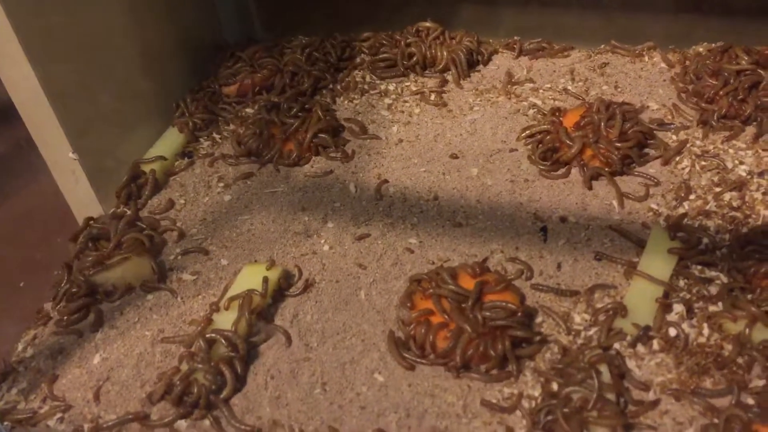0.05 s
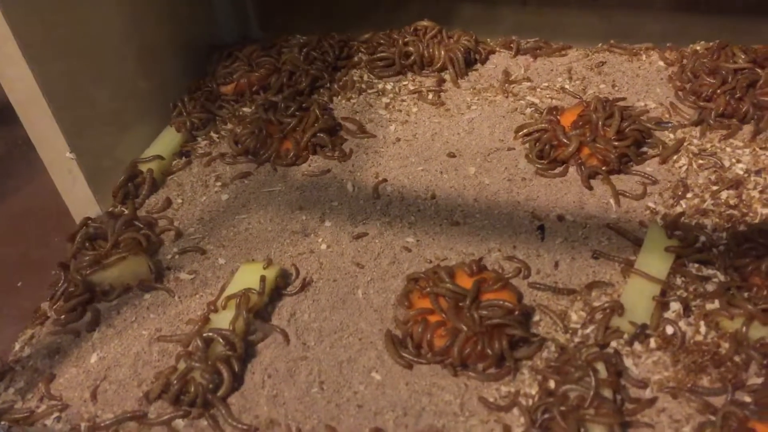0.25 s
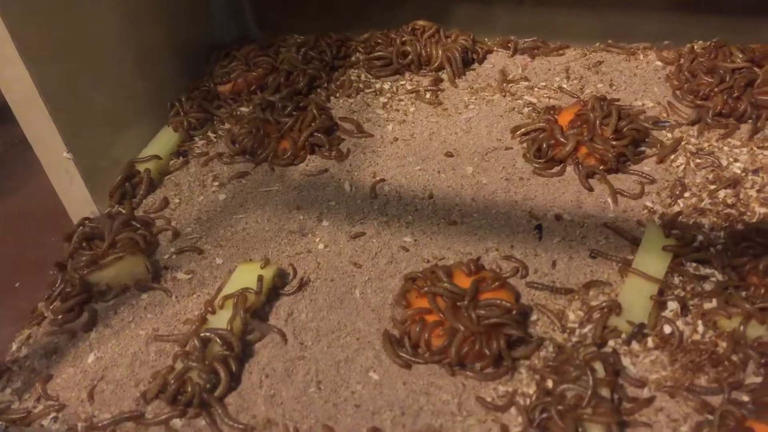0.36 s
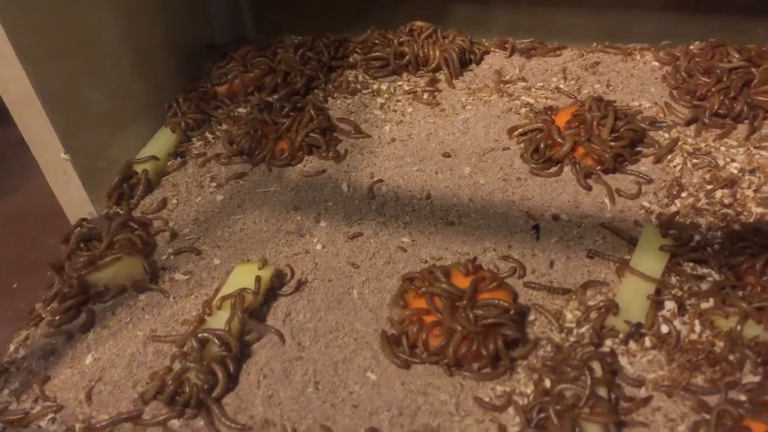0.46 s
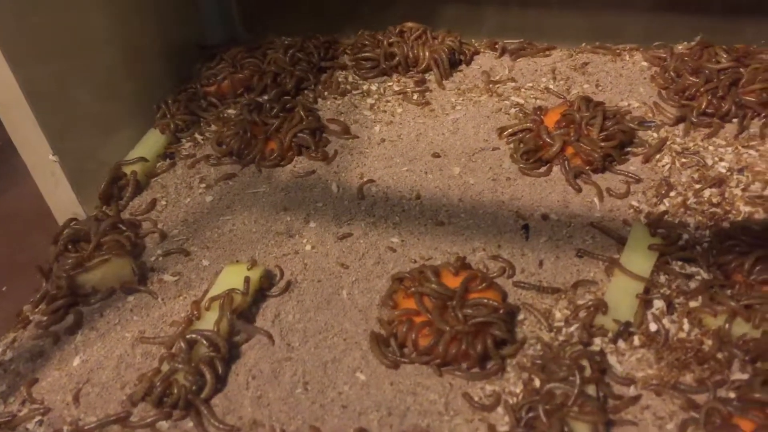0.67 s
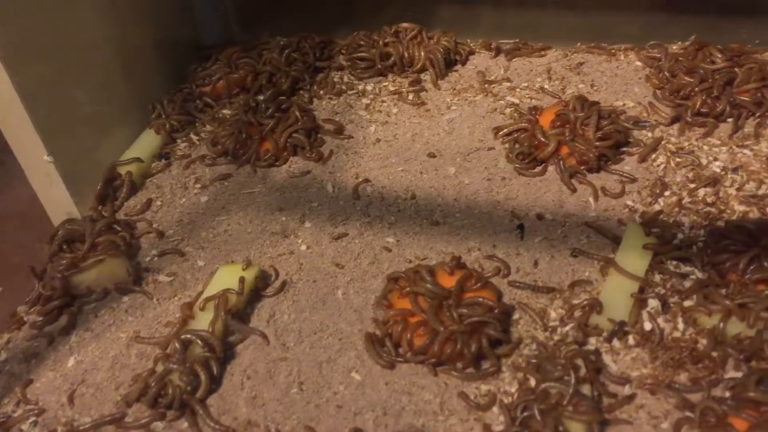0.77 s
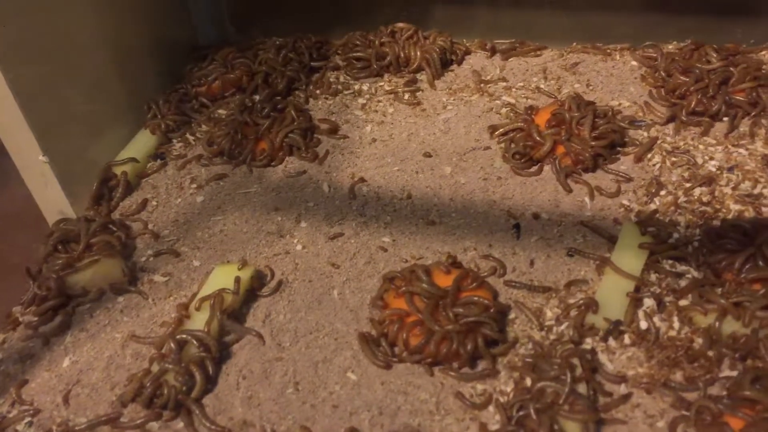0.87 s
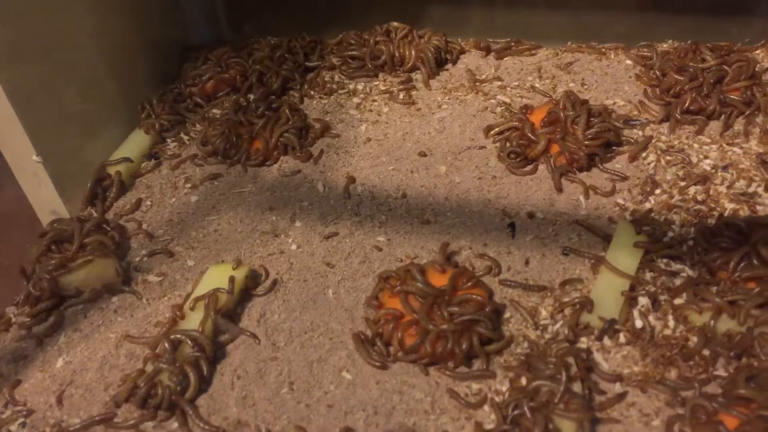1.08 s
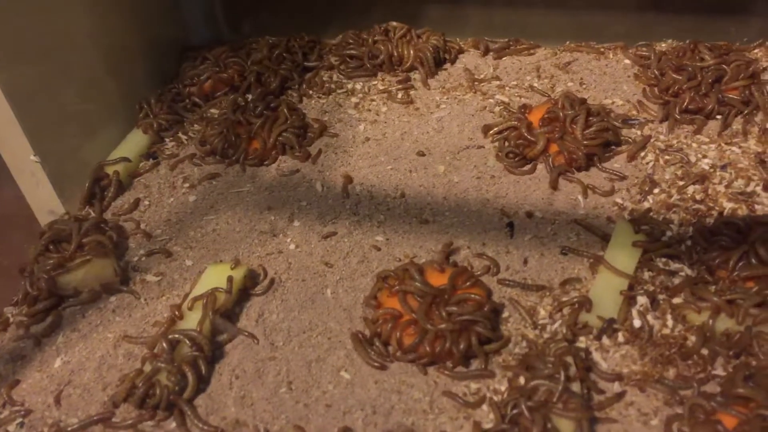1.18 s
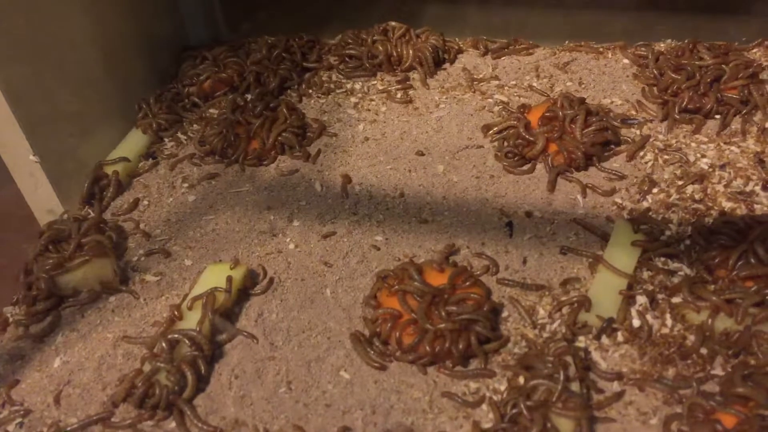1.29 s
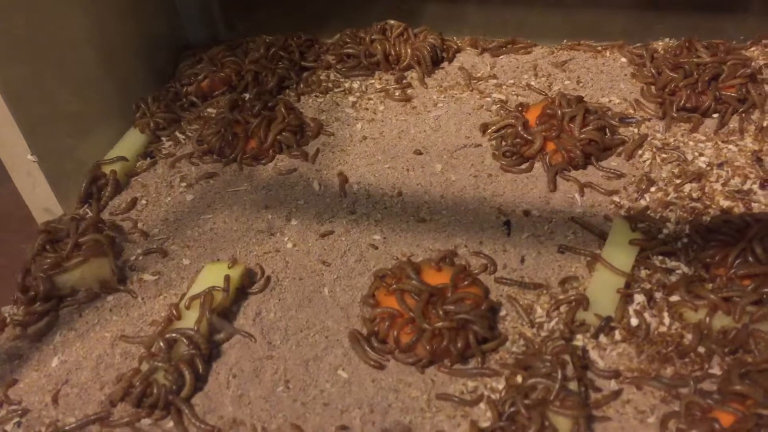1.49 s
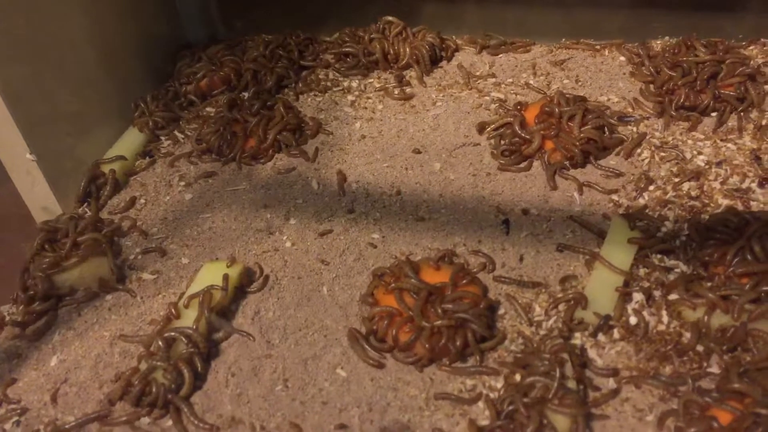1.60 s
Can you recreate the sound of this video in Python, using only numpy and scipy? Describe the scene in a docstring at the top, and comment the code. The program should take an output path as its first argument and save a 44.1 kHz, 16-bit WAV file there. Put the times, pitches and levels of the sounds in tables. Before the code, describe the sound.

A plastic tub is handled close up, giving a soft, low, shuddering thump at about 0.3 seconds, with a dull finger scuff and a brief falling groan from its wall. Smaller nudges fade away through 1.5 seconds. Very faint dry bran rustles accompany the handling, with tiny squeaks near 1.1 and 1.5 seconds. Quiet room hiss and a low electrical hum continue throughout.

```python
"""A quiet room, close over a plastic tub of mealworms: steady air hiss, mains hum and fan tones.
The tub is handled once: a push sets it swinging in a soft, shuddering thump over a low rumble,
then come smaller and smaller nudges. Fingers rub the wall, which groans on a falling note, and
friction rings its modes in a dull scuff. Faint dry bran rustles and tiny stick-slip squeaks
come with the handling."""
import sys
import numpy as np
from scipy import signal
from scipy.fft import rfft, irfft
from scipy.io import wavfile

SR = 44100
rng = np.random.default_rng(int(sys.argv[2]) if len(sys.argv) > 2 else 0)


def unload_wav(signal):
    """Save mono or channel-first audio to the path in sys.argv[1] as 16-bit WAV at rate SR, clipped to [-1, 1]."""
    wavfile.write(
        sys.argv[1],
        SR,
        np.round(np.clip(np.atleast_2d(signal).T, -1, 1) * 32767).astype(np.int16),
    )


N = 72765
T = np.arange(N) / SR
HZ = np.fft.rfftfreq(N, 1 / SR)

# air and hiss spectrum (frequency [Hz], relative density [dB])
AIR_SPECTRUM = [(20, -13.5), (45, 8), (70, 6), (130, 3.5), (180, -2.5), (300, -2.5), (480, -12),
                (950, -11.5), (1500, -15.5), (2300, -15), (3200, -17), (4400, -18.5), (5000, -21.5),
                (6300, -19.5), (7600, -23.5), (8900, -21.5), (10500, -26.5), (11800, -24.5), (13500, -24.5),
                (14800, -32), (16000, -22)]
# mains hum and fan tones (frequency [Hz], level [dB])
HUM_TONES = [(60, -69.5), (120, -68.5), (240, -77.5), (300, -76), (360, -80.5), (420, -95), (600, -90.5),
             (660, -93), (840, -90), (900, -98), (1500, -93.5), (1919, -90)]
# dry bran rustles (peak time [s], centre [Hz], width [Hz], level [dB], rise and fall [s])
BRAN_RUSTLES = [(0.106, 2120, 597, -74.5, 0.04), (0.153, 9000, 12500, -76.5, 0.017),
                (0.299, 7600, 12100, -74.5, 0.032), (0.358, 4150, 1000, -70, 0.021),
                (0.359, 9550, 12500, -74, 0.04), (.495, 10200, 11300, -71.5, 0.025),
                (1.026, 4500, 700, -76.5, 0.014), (1.09, 4000, 1210, -76.5, 0.015),
                (1.114, 1400, 1300, -72, 0.024), (1.124, 2250, 1000, -77, 0.014)]
# stick-slip squeaks (peak time [s], pitch [Hz], level [dB], rise [s], fall [s], roughness [0-1])
SLIP_SQUEAKS = [(0.247, 1029, -66, 0.017, 0.0051, 0.25), (0.275, 662, -64, 0.013, 0.028, 0.07),
                (0.32, 1254, -71.5, 0.016, 0.0065, 0), (0.35, 430, -65, 0.056, 0.017, 0),
                (1.0895, 2123, -63, 0.0046, 0.0067, 0.1), (1.101, 2126, -60.5, 0.0049, 0.0062, 0),
                (1.538, 2413, -68.5, 0.016, .015, 0.96), (1.546, 2138, -62.5, 0.012, 0.0057, 0),
                (1.565, 2210, -68, 0.016, 0.011, 0.54)]
# tub modes (frequency [Hz], width [Hz], relative level [dB])
TUB_MODES = [(281.4, 60, 8), (410, 75, -3.5), (560, 21, -11.5), (654, 100, -4.5), (864, 220, -5.5),
             (1077, 47, -11), (1286, 30, -14)]
# wall scuff envelope (time [s], level [dB])
SCUFF_ENVELOPE = [(.21, -87), (.232, -65), (.252, -54), (.275, -59), (.31, -65), (.36, -64), (.39, -69),
                  (.52, -76.5), (.62, -85)]
# handling rumble envelope (time [s], level [dB])
RUMBLE_ENVELOPE = [(0, -63.5), (.2, -60.5), (.3, -50), (.45, -50.5), (.65, -66.5), (.84, -59.5), (.97, -84),
                   (1.22, -96), (1.38, -65), (1.54, -75), (1.65, -73)]
# finger rub envelope (time [s], level [dB])
RUB_ENVELOPE = [(0, -59.5), (.1, -68.5), (.2, -63.5), (.25, -52.5), (.32, -48), (.38, -54), (.46, -61.5),
                (.55, -71), (.65, -88), (.9, -86)]
# wall groan (time [s], pitch [Hz], level [dB])
GROAN_TRACK = [(.22, 275, -62.5), (0.244, 273.6, -55.5), (.255, 258.4, -41.5), (0.273, 258.5, -52.5),
               (0.291, 224.3, -42.5), (0.309, 198, -35), (0.321, 196, -38), (0.331, 197, -79),
               (0.361, 187, -74)]
# tub swings (peak time [s], pitch [Hz], level [dB], rise [s], fall [s])
TUB_BUMPS = [(0.036, 135, -50.5, 0.027, 0.0065), (0.237, 135, -43, 0.0054, 0.0027),
             (.277, 111.9, -31, 0.027, 0.0376), (0.276, 71.43, -37.5, 0.032, 0.051),
             (0.347, 83.45, -29, 0.026, 0.0074), (0.373, 195, -52.5, .016, 0.0077),
             (0.406, 110, -40, .009, .022), (.44, 180, -56, 0.027, 0.018), (.458, 103, -43.5, 0.007, 0.011),
             (0.525, 90, -47.5, 0.0066, 0.023), (.582, 92, -48, 0.024, 0.021),
             (.722, 100, -49, 0.0069, 0.0065), (0.798, 85, -63, 0.011, 0.033),
             (.849, 85, -55.5, 0.014, 0.036), (1.036, 75, -46.5, 0.0032, 0.0094),
             (1.068, 110, -55, 0.015, 0.04), (1.353, 81.4, -59, 0.0087, 0.014),
             (1.48, 105.3, -57.5, 0.016, 0.021)]


def amp(db):
    """Decibels to gain."""
    return 10 ** (np.asarray(db) / 20)


def noise(gain):
    """Unit-rms noise, shaped by a gain per frequency."""
    x = irfft(rfft(rng.standard_normal(N)) * gain, N)
    return x / np.sqrt(np.mean(x ** 2) + 1e-30)


def band(hz, width_hz):
    """Resonance curve; full width at half gain."""
    return 1 / (1 + (2 * (HZ - hz) / width_hz) ** 2)


def swell(peak_s, rise_s, fall_s):
    """Gaussian rise to 1, Gaussian fall."""
    return np.exp(-((T - peak_s) / np.where(T < peak_s, rise_s, fall_s)) ** 2)


def envelope(points):
    """Gain over time from (time [s], level [dB]) points."""
    return amp(np.interp(T, *np.transpose(points)))


def tone(hz):
    """Sine on a steady or moving pitch, random phase."""
    return np.sin(2 * np.pi * (np.cumsum(hz * np.ones(N)) / SR + rng.random()))


def waver(depth_rms, width_hz):
    """Random drift about 1."""
    return 1 + depth_rms * noise(band(0, width_hz))


def room_air(level_db=-66):
    """Steady broadband air and hiss."""
    hz, db = np.transpose(AIR_SPECTRUM)
    spectrum_db = np.interp(np.log(HZ + 1), np.log(hz), db)
    return amp(level_db) * noise(amp(spectrum_db))


def hum():
    """Mains and fan tones, each wavering slightly in level."""
    return sum(amp(db) * np.sqrt(2) * tone(hz) * waver(0.05, width_hz=15) for hz, db in HUM_TONES)


def reverb(source, level_db=-16.5, t60_s=0.18, delay_s=0.006):
    """Small-room reflections: a faint, short noise tail."""
    tail = rng.standard_normal(N) * amp(-60 * T / t60_s) * (T > delay_s)
    return amp(level_db) * signal.fftconvolve(source, tail / np.linalg.norm(tail))[:N]


def bran_rustles():
    """Dry grains brush in brief, soft noise bursts."""
    return sum(amp(db) * swell(peak_s, ramp_s, ramp_s) * noise(band(hz, width_hz))
               for peak_s, hz, width_hz, db, ramp_s in BRAN_RUSTLES)


def squeaks():
    """Stick-slip: each slip sings on one wavering pitch, clean or scratchy."""
    out = np.zeros(N)
    for peak_s, hz, db, rise_s, fall_s, roughness in SLIP_SQUEAKS:
        clean = np.sqrt(2) * tone(hz * waver(0.005, width_hz=82))
        scratch = noise(band(hz, width_hz=360))
        blend = np.sqrt(1 - roughness) * clean + np.sqrt(roughness) * scratch
        out += amp(db) * swell(peak_s, rise_s, fall_s) * blend
    return out


def wall_scuff():
    """Friction rings the tub modes during the thump."""
    modes = sum(amp(db) * band(hz, width_hz) / np.sqrt(width_hz) for hz, width_hz, db in TUB_MODES)
    return envelope(SCUFF_ENVELOPE) * noise(modes)


def handling_rumble():
    """Low noise that swells as the tub is handled."""
    return envelope(RUMBLE_ENVELOPE) * noise(band(hz=79.2, width_hz=120) ** 2)


def finger_rub():
    """Fingers rub the tub: a dull, uneven brush."""
    return envelope(RUB_ENVELOPE) * noise(band(hz=161.6, width_hz=125) ** 2)


def wall_groan():
    """The rubbed wall sounds one note, falling as the push slows."""
    time_s, hz, db = np.transpose(GROAN_TRACK)
    gain = amp(np.interp(T, time_s, db, left=-np.inf, right=-np.inf))
    return gain * tone(np.interp(T, time_s, hz))


def tub_bumps():
    """Soft pushes swing the tub for a few cycles each."""
    return sum(amp(db) * swell(peak_s, rise_s, fall_s) * tone(hz)
               for peak_s, hz, db, rise_s, fall_s in TUB_BUMPS)


def scene():
    """Room background, handled tub and its reflections; mono."""
    friction = squeaks() + wall_scuff() + finger_rub() + wall_groan()
    tub = bran_rustles() + handling_rumble() + friction + tub_bumps()
    return (room_air() + hum() + reverb(tub) + tub)[None]


def record(dry, low_cut_hz=63, high_cut_hz=15800):
    """Microphone low cut, then a steep band limit."""
    highpassed = irfft(rfft(dry) * HZ ** 2 / np.hypot(HZ ** 2, low_cut_hz ** 2), N)
    lowpass = signal.firwin(511, high_cut_hz, window=("kaiser", 9), fs=SR)
    return signal.oaconvolve(highpassed, lowpass[None], "same")


dry = scene()
out = record(dry)
unload_wav(out)
```